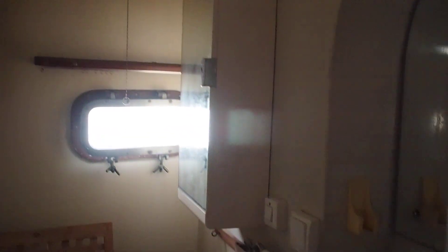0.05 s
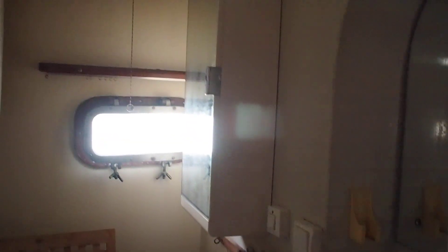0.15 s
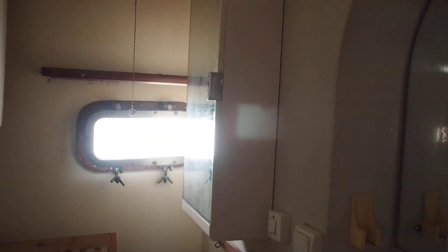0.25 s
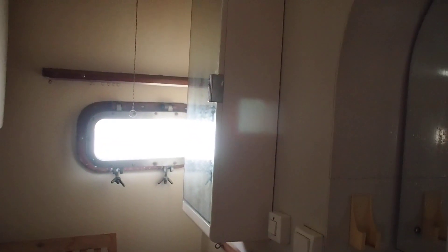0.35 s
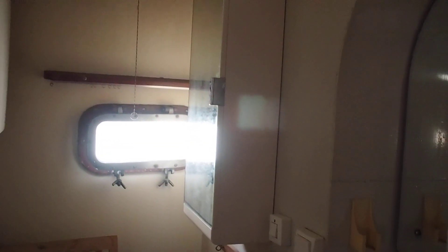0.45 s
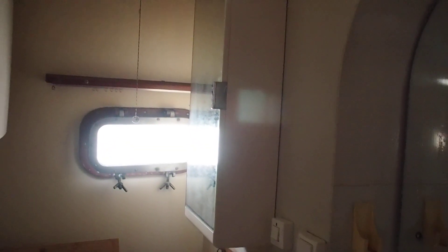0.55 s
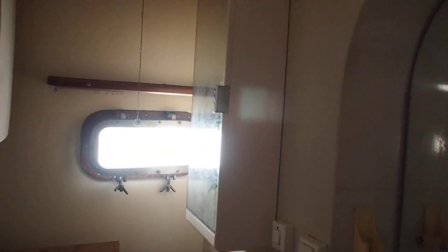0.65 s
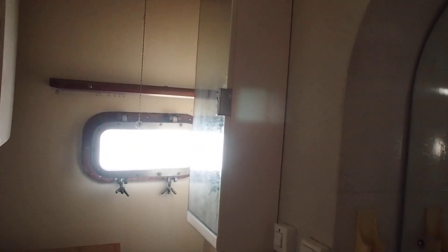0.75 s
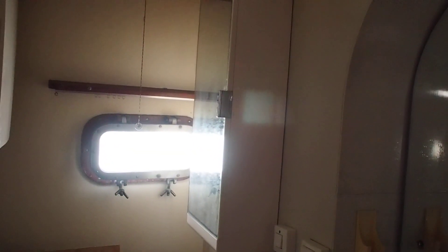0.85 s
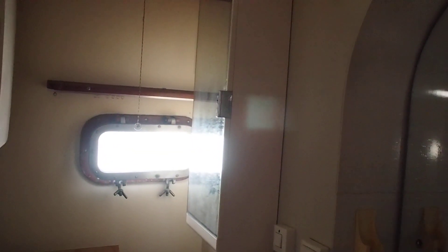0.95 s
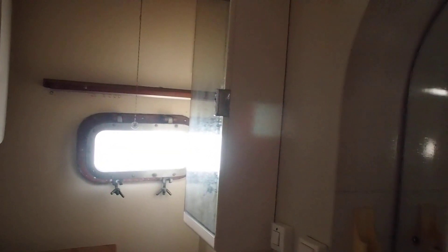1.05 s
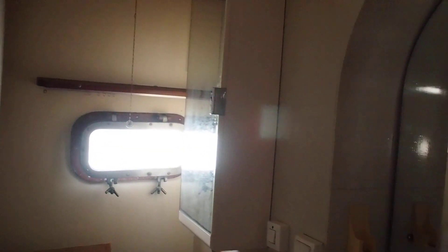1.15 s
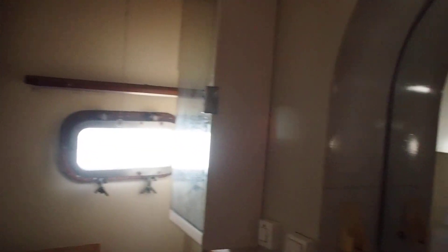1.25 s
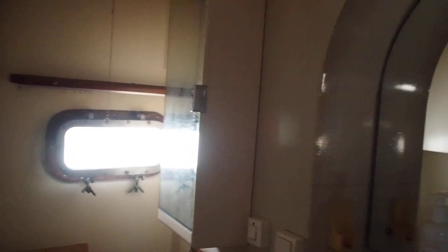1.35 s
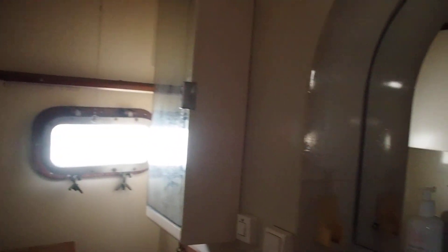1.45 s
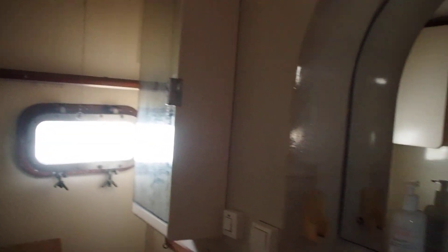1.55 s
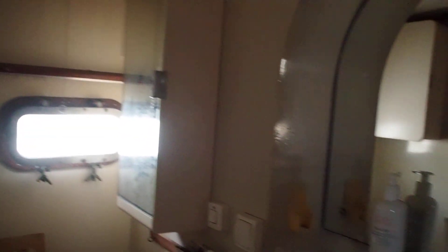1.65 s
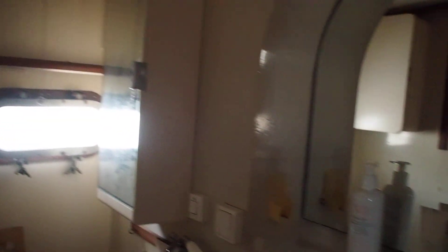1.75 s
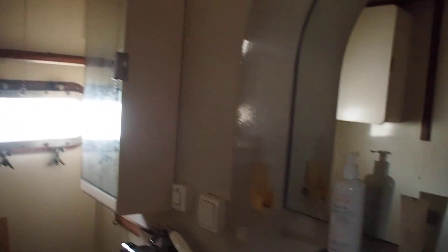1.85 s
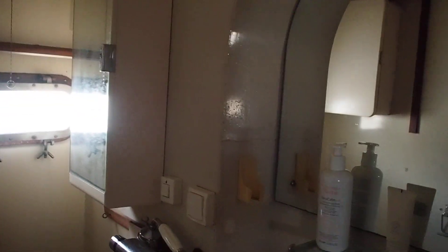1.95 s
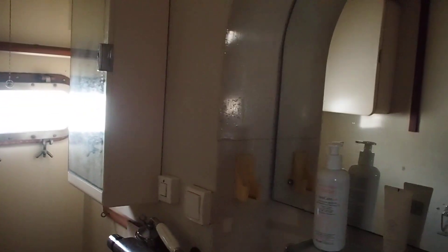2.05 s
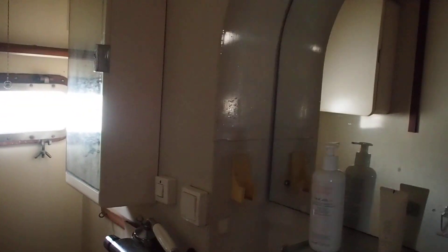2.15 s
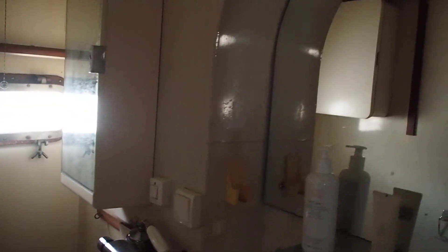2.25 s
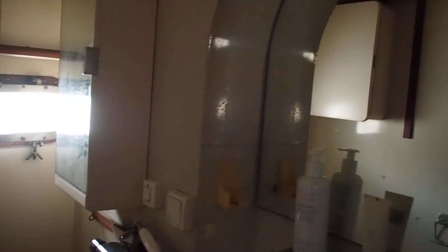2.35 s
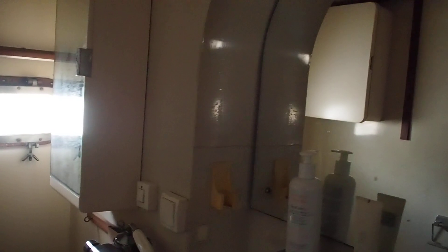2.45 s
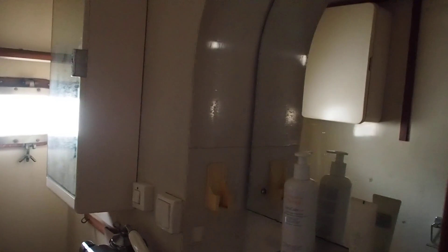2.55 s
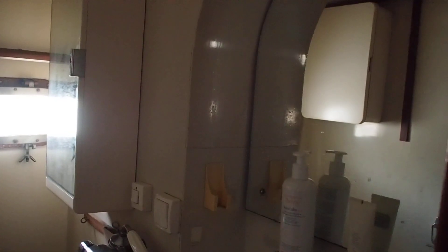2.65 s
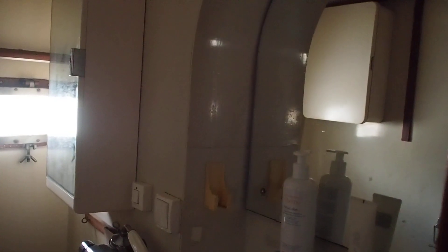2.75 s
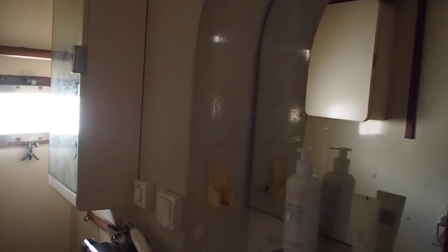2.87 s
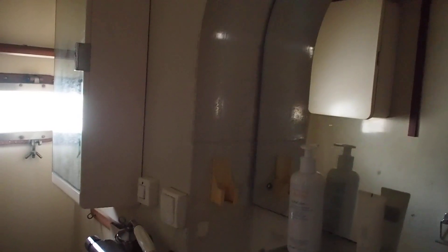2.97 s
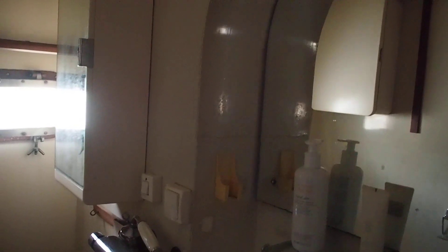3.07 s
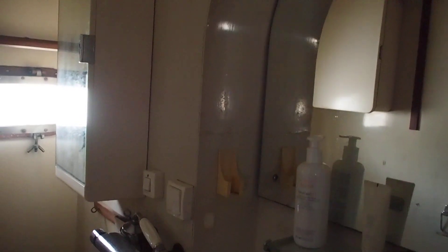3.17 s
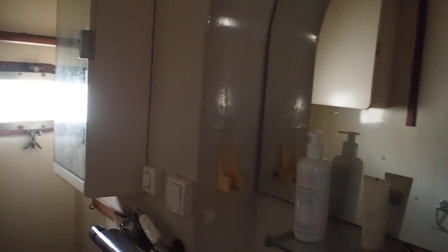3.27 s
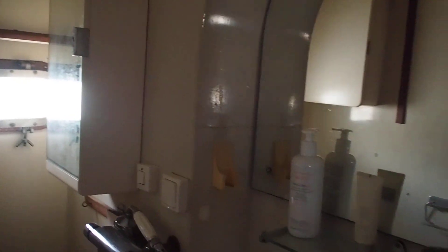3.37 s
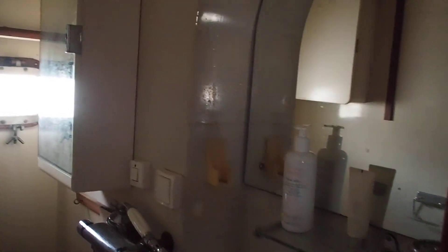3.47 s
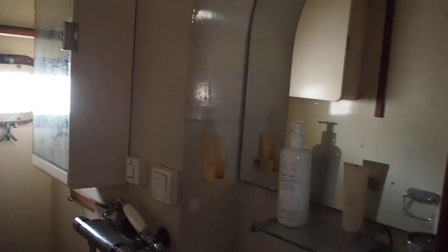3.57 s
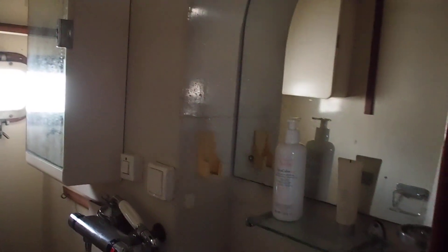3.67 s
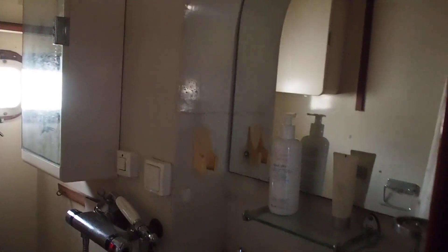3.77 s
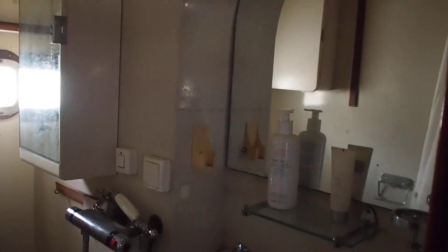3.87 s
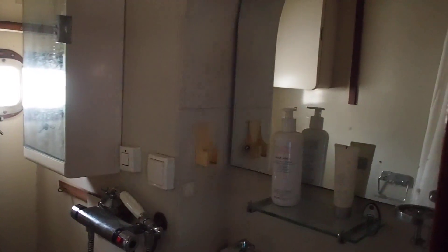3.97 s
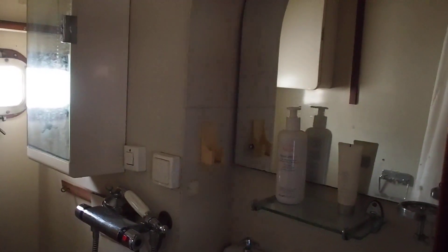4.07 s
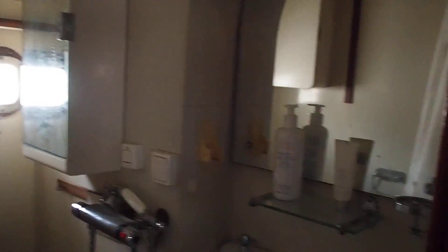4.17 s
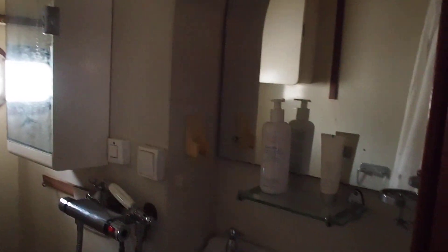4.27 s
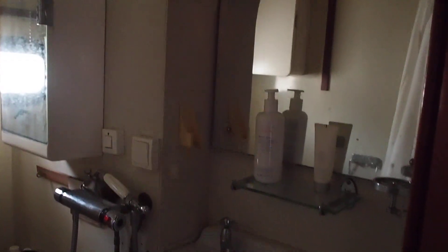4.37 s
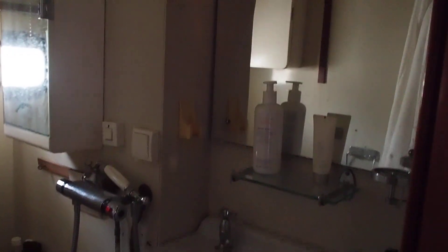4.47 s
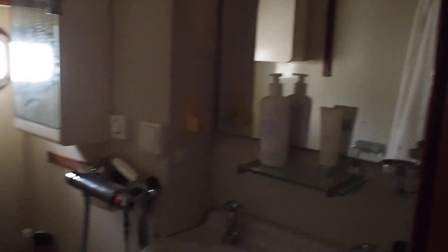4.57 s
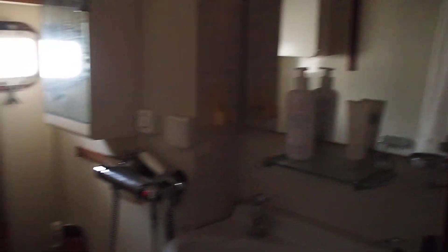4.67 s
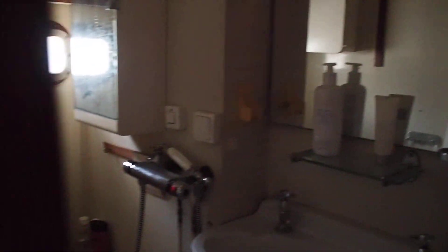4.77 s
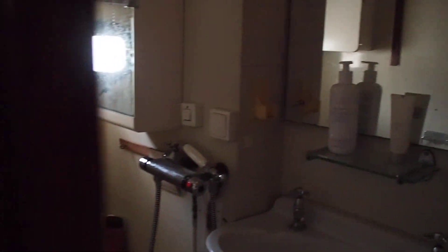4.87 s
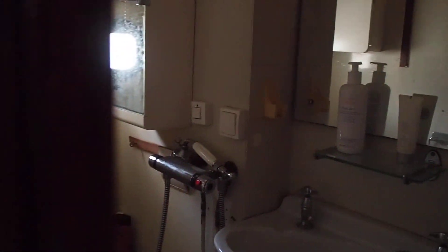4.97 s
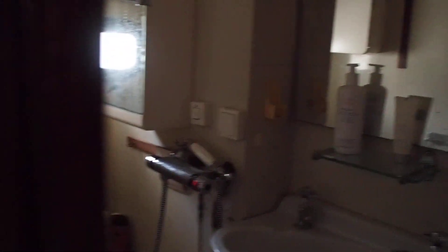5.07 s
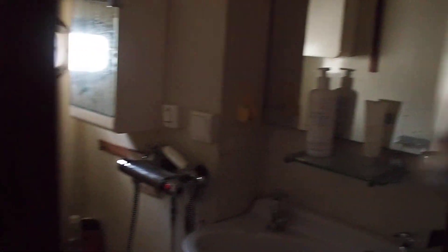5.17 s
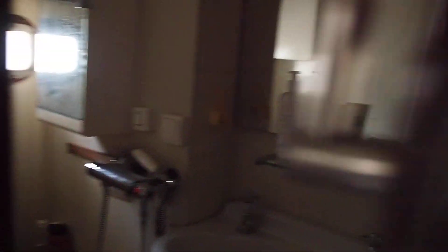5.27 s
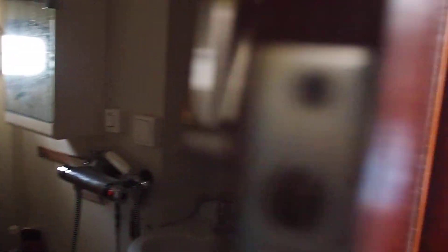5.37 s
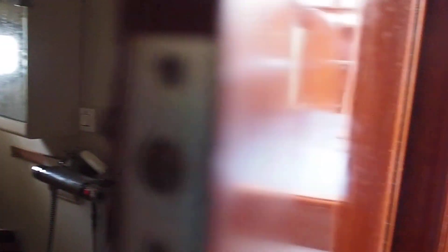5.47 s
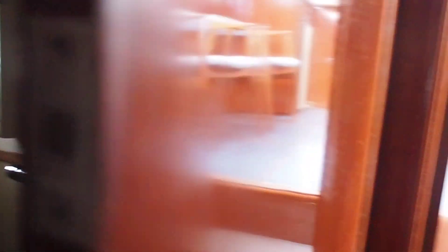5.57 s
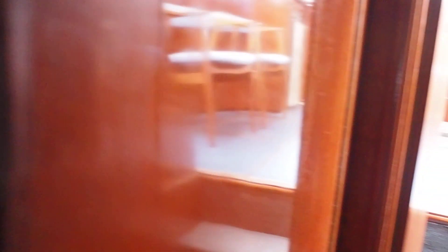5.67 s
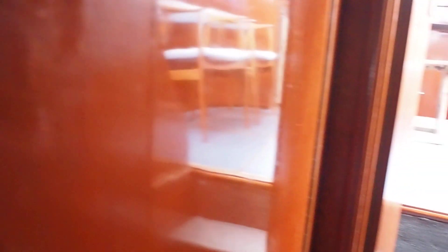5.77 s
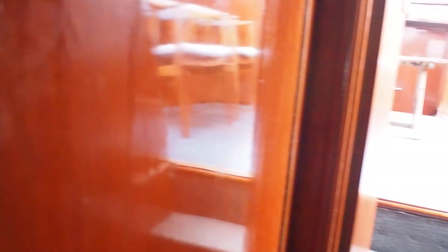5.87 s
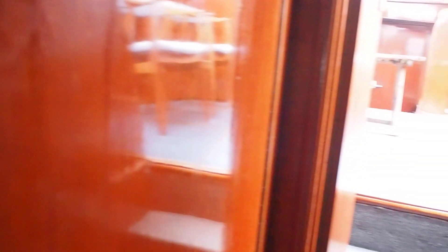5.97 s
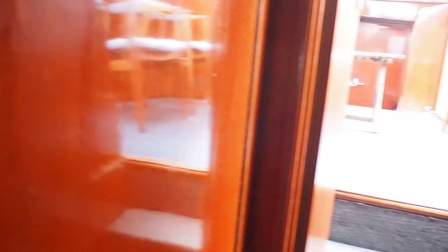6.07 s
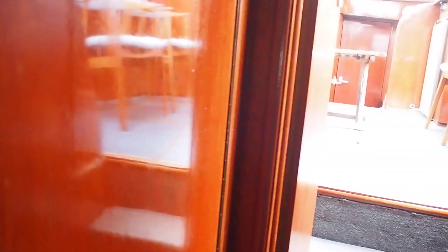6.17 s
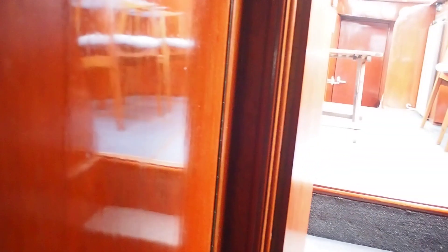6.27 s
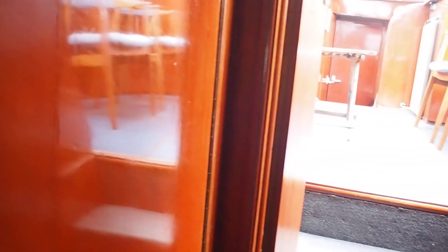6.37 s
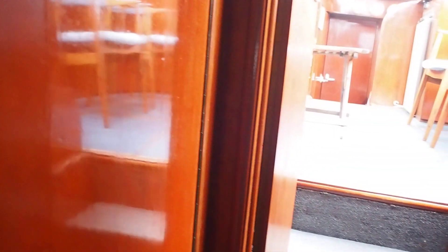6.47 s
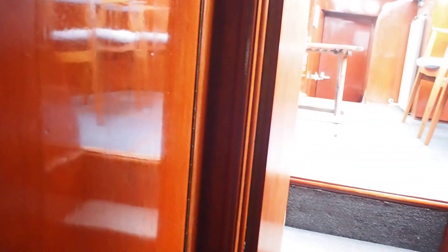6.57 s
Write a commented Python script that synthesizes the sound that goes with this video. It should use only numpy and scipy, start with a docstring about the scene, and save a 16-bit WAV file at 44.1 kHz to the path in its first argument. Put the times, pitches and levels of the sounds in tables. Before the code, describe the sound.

Someone moves about a cramped boat washroom with light knocks and hollow taps before a hard door bang and a buzzing, woody chatter.

```python
"""Bumps and a chattering door in a small wooden boat cabin

Someone shuffles about over a steady hiss: filtered noise makes floorboard rumble, shuffling and brushing cloth.
Bumps on panels and fittings are damped modes and decaying noise bursts, coloured by hull and panel resonances.
A door is pushed shut against its catch; a springy fitting on it then strikes the door unevenly before settling
to twenty strikes a second that fade and soften. Each strike excites the same door modes and cabin tail."""
import sys
import numpy as np
from scipy import signal
from scipy.fft import rfft, irfft, next_fast_len
from scipy.io import wavfile
from scipy.ndimage import uniform_filter1d

SR = 44100
rng = np.random.default_rng(int(sys.argv[2]) if len(sys.argv) > 2 else 0)


def unload_wav(signal):
    """Save mono or channel-first audio to the path in sys.argv[1] as 16-bit WAV at rate SR, clipped to [-1, 1]."""
    wavfile.write(
        sys.argv[1],
        SR,
        np.round(np.clip(np.atleast_2d(signal).T, -1, 1) * 32767).astype(np.int16),
    )


N = 291893
SIZE = next_fast_len(N + SR)  # room for tails, so that filtering does not wrap round
HZ = np.fft.rfftfreq(SIZE, 1 / SR)

# Resonances of the hull. Each row: frequency in Hz, width in Hz, relative level in dB.
HULL = [(51, 20, -51), (89, 23, -7), (109.8, 56, 2.5), (128.2, 31, 5), (213, 39, 0.5), (263.4, 15, 1)]


def amp(db):
    """Level in decibels to a pressure ratio."""
    return 10 ** (np.asarray(db) / 20)


def unit(x):
    """Normalisation to unit root-mean-square."""
    return x / np.sqrt(np.mean(x ** 2))


def shape(table):
    """Zero-phase gain, interpolated in dB over log frequency from (Hz, dB) points."""
    hz, db = np.transpose(table)
    return amp(np.interp(np.log(HZ + 1), np.log(hz + 1), db))


def peaks(table, floor_db=-60):
    """Modal superposition: second-order resonances of alternating sign over a flat floor."""
    response = amp(floor_db)
    for k, (hz, width, db) in enumerate(table):
        damping = 1j * HZ * width
        response = response + (-1) ** k * amp(db) * damping / (hz * hz - HZ ** 2 + damping)
    return response


def colour(x, response):
    """Linear filtering: convolution as multiplication of spectra."""
    return irfft(rfft(x, SIZE) * response, SIZE)[..., :N]


def band(x, lo_hz, hi_hz):
    """Band-pass filtering with maximally flat Butterworth edges."""
    return signal.sosfilt(signal.butter(2, [lo_hz, hi_hz], "bandpass", fs=SR, output="sos"), x)


def walk(rate):
    """Slow random modulation: levels held for 1 / rate seconds, then smoothed twice."""
    hold = int(SR / rate)
    steps = np.repeat(rng.standard_normal(N // hold + 1), hold)
    return 1.29 * uniform_filter1d(uniform_filter1d(steps, hold), hold)[:N]


def add(out, s, x):
    """Superposition: adds x to out from s seconds onwards."""
    i = int(s * SR)
    out[..., i:i + x.shape[-1]] += x[..., :N - i]


def ring(db, hz, rise_s, t60_s):
    """One damped mode: a sine with exponential rise and decay."""
    t = np.arange(SR // 2) / SR
    return (1 - np.exp(-t / rise_s)) * amp(db - 60 * t / t60_s) * np.sin(2 * np.pi * hz * t)


def burst(contact_s, t60_s):
    """Mid and side noise: scraping contact, then the exponential decay of a diffuse field."""
    t = np.arange(SR // 2) / SR
    envelope = (1 - np.exp(-t / 0.0004)) * amp(-60 * np.maximum(t - contact_s, 0) / t60_s)
    return envelope * rng.standard_normal((2, len(t)))


def spread(pair):
    """Spatial coherence: close microphone ports agree in the bass and differ in the treble."""
    # Gain of the side signal. Each row: frequency in Hz, gain in dB.
    side_gain = [(60, -9), (200, -18), (400, -12), (800, -8), (1500, -4), (3000, 0.5), (8000, 1),
                 (15000, -1.5)]
    side = colour(pair[1], shape(side_gain))
    return np.array([pair[0] + side, pair[0] - side])


def moving():
    """Filtered noise: floorboard rumble, shuffling and brushing cloth, each flickering over a hiss."""
    # Level of rumble and shuffle; from about 5.8 s also the door's dying resonance.
    # Each row: time in seconds, rumble in dB, shuffle in dB.
    level_rows = [(0.0, -52.5, -58), (0.39, -54.5, -56), (0.68, -50, -55), (0.83, -49, -57),
                  (1.42, -43, -51.5), (2.27, -49.5, -54.5), (2.8, -47.5, -60.5), (3.15, -52, -57.5),
                  (3.85, -43.5, -52), (3.98, -47, -57.5), (4.37, -51.5, -55.5), (4.64, -55, -45),
                  (5.0, -51, -55.5), (5.2, -49, -47.5), (5.5, -54.5, -52.5), (5.68, -47, -49),
                  (5.78, -39.5, -42), (6.03, -35.5, -51), (6.62, -43, -49.5)]
    # Cloth near the microphones. Each row: start in seconds, length in seconds, level in dB.
    brush_rows = [(0.193, 0.14, -52.5), (0.548, 0.11, -54), (1.648, 0.13, -51), (1.995, 0.08, -54.5),
                  (4.695, 0.11, -58)]
    # Spectra of shuffle and hiss. Each row: frequency in Hz, relative level in dB.
    shuffle_spectrum = [(200, -6.5), (320, -24), (430, 0), (600, -8), (800, -10), (1400, -11.5),
                        (1700, -41), (3000, -19.5), (7000, -29)]
    hiss_spectrum = [(900, -13.5), (1500, -3.5), (3000, -8), (5600, -6.5), (8000, -9.5), (12000, -8.5),
                     (14500, -31), (15900, -32)]
    hiss_db = -60

    t = np.arange(N) / SR
    s, *columns = np.transpose(level_rows)
    rumble_db, shuffle_db = (np.interp(t, s, column) for column in columns)
    rumble, shuffle, hiss, brush = rng.standard_normal((4, 2, N))

    # each hull resonance flickers by itself
    boards = sum(amp(8.45 * walk(9.7)) * colour(rumble, peaks([mode])) for mode in HULL)
    strokes = np.zeros(N)
    for start, length, db in brush_rows:
        rise = np.clip((t - start) / 0.0034, 0, 1)
        fall = np.clip((start + length - t) / 0.057, 0, 1)
        strokes += amp(db) * rise * fall

    rumble = amp(rumble_db) * unit(boards)
    shuffle = amp(shuffle_db + 2.1 * walk(25)) * unit(colour(shuffle, shape(shuffle_spectrum)))
    hiss = amp(hiss_db + 0.36 * walk(6.2)) * unit(colour(hiss, shape(hiss_spectrum)))
    cloth = strokes * amp(0.7 * walk(33)) * unit(band(brush, 2300, 14000))
    return spread(rumble + shuffle + hiss + cloth)


def fittings():
    """Impact excitation: hollow tocks with a cabin answer, bright ticks, and hull flexing under steps."""
    # Taps on hollow fittings, small hard ticks of a fitting, and heavy steps that flex the hull.
    # Each row: start in seconds, nominal level in dB, frequency in Hz.
    tock_rows = [(1.311, -30, 400), (1.363, -36.5, 406), (2.452, -25.5, 406), (2.573, -25, 426),
                 (2.712, -27.5, 408), (2.897, -26, 417), (3.521, -38, 380), (4.977, -31, 382),
                 (5.033, -26, 382)]
    tick_rows = [(1.022, -37, 1440), (1.159, -37, 1340), (2.8555, -26, 1800), (3.4795, -38, 1830),
                 (3.5239, -42, 1920), (3.5726, -37.5, 1850), (3.6311, -44, 1900), (4.374, -40, 1820),
                 (5.1497, -23.5, 1870), (5.1993, -30.5, 1390), (5.2716, -18.5, 1510)]
    step_rows = [(.5, -55, 51.4), (1.709, -36, 52.5), (1.884, -37, 99.2), (1.973, -43, 104.7),
                 (2.45, -46, 52.6), (3.476, -44, 119), (3.55, -60, 77), (3.821, -38, 51), (3.829, -37, 85),
                 (5.04, -40, 52.3), (5.85, -26, 51), (5.871, -27, 79.3), (5.959, -31.5, 125),
                 (6.08, -38, 51.3), (6.33, -42, 123)]

    out = np.zeros((2, N))
    for s, db, hz in tock_rows:
        add(out[0], s, ring(db + 5, hz, rise_s=0.0025, t60_s=0.059))
        answer = band(burst(0.012, t60_s=0.16), 220, 1050)
        add(out, s + 0.001954, amp(db - 0.5) * answer)
    for s, db, hz in tick_rows:
        add(out, s, amp(db + 4.5) * band(burst(0.006, t60_s=0.11), hz / 1.53, hz * 1.126))
    for s, db, hz in step_rows:
        add(out[0], s, ring(db + 3, hz, rise_s=0.003, t60_s=0.56))
    return spread(out)


def bumps():
    """Impact response: each blow shakes the hull, rings the panels and cracks; the thud noise lasts longest."""
    # Blows on the woodwork. Each row: start in seconds, nominal level in dB, then relative to it thud in dB,
    # thud frequency in Hz, crack in dB, sizzle in dB, body centre in Hz, contact in milliseconds.
    blow_rows = [(0.321, -46.5, -18, 124, -23.5, -1, 1020, 7.1), (0.454, -38, -16, 148, -30, -32, 514, 12),
                 (0.486, -19, -15, 107, -8, -9.5, 436, 17.6), (1.019, -38.5, -15, 140, -28, -26, 1420, 8),
                 (1.161, -48, -19, 190, -14, -24, 680, 4.5), (1.295, -34.5, -15, 223, -22, -23, 445, 5.6),
                 (1.325, -32, -13, 186, -0.5, -11, 450, 10.4), (1.679, -38.5, -10, 232, -7, -7, 770, 15),
                 (1.9, -36.5, -13, 98, -7.5, -10, 590, 15), (2.423, -45.5, 2, 98, -21, -29, 350, 7),
                 (2.734, -32, -11, 197, -7.5, -10, 532, 5.7), (2.853, -34.5, -19.5, 238, -31, -40, 1560, 6),
                 (2.93, -29.5, -13.5, 234, -5.5, -4.5, 473, 15.4),
                 (3.253, -51.5, -1, 202, -13, -20, 465, 8), (3.521, -32, -5.5, 94, -36, -14, 374, 5.9),
                 (3.569, -39, -28, 116, -23, -28, 377, 5.4), (3.729, -13, -19, 246, -34, -20, 1190, 6.1),
                 (3.792, -41.5, -15, 198, -13, 5, 496, 5.4), (3.951, -38, -8, 228, -35, -31, 460, 10),
                 (4.038, -40, -3.5, 130, -32, -29, 380, 7), (4.114, -36, -8.5, 218, -22, -17, 386, 5.3),
                 (4.226, -36, -7.5, 127, -30, -15, 373, 11), (4.378, -35.5, -7, 124, -22, -29, 408, 5.7),
                 (4.431, -28.5, -21, 103, -17, -19, 545, 5),
                 (4.567, -17.5, -24.5, 232, -13, -8.5, 1005, 4.6),
                 (4.624, -23.5, -12.5, 290, -15, -35, 834, 20),
                 (4.639, -23.5, -19, 206, -20, -18, 975, 6.4), (4.756, -32.5, -8, 268, -12, -18, 607, 4.4),
                 (4.858, -39, -14, 228, -14, -24, 1010, 8.4), (4.977, -35, -4, 115, -10, -5, 357, 2.1),
                 (5.038, -34, 1.5, 176, -32, -13, 334, 3.7), (5.149, -23, -13, 262, -8, -21, 310, 23),
                 (5.189, -23.5, -14, 248, -17, -40, 308, 13), (5.269, -22, -14.5, 256, -4, -24, 311, 7.3),
                 (5.348, -37, -5, 113, -22, -14, 432, 6), (5.587, -11.5, -16, 273, -3, -13.5, 744, 2.5),
                 (5.726, -36.5, -3, 230, -21, -11, 404, 6.2), (5.829, -5.5, -22.5, 260, 2.5, -6.5, 1307, 3),
                 (5.86, -14.5, -14, 112, 1.5, -33, 598, 5.6), (5.904, -23.5, -10, 109, 3, -33, 499, 4.5)]
    # Resonances of the panels. Each row: frequency in Hz, width in Hz, relative level in dB.
    panel_modes = [(380, 105, -13.5), (550, 164, 1), (1092, 140, -7.5), (1367, 62, -3), (1914, 153, -7.5)]
    # harder blows shake more of the panelling: octaves either side of the body centre
    spread_oct, spread_oct_per_db, least_oct, most_oct, soft_db = 1, 0.3, 0.2, 1.68, -36.5
    grit_db, grit_per_s = 2, 330  # uneven contact: depth and pace

    thud, body, crack, sizzle = np.zeros((4, 2, N))
    for s, db, thud_db, thud_hz, crack_db, sizzle_db, hz, contact_ms in blow_rows:
        contact = contact_ms / 1000
        edge = 2 ** np.clip(spread_oct + spread_oct_per_db * (db - soft_db), least_oct, most_oct)

        add(thud[0], s, ring(db + thud_db + 11, thud_hz, rise_s=0.0013, t60_s=0.11))
        # dividing by the root of the bandwidth keeps the noise level alike at any pitch
        low = band(burst(contact, t60_s=0.35), thud_hz / 2.8, thud_hz * 1.64) / np.sqrt(thud_hz / SR)
        add(thud, s + 0.00312, amp(db + thud_db - 1) * low)

        bandwidth = hz * (edge - 1 / edge)
        knock = band(burst(contact, t60_s=0.18), hz / edge, hz * edge) / np.sqrt(bandwidth / SR)
        add(body, s, amp(db) * knock)
        add(body[0], s, ring(db + 1.5, hz, rise_s=0.00066, t60_s=0.13))

        add(crack, s, amp(db + crack_db) * burst(contact, t60_s=0.12))
        scratch = amp(-2) * burst(contact, t60_s=0.15) + amp(2) * burst(0.002, t60_s=0.032)
        add(sizzle, s, amp(db + sizzle_db) * scratch)

    body, crack, sizzle = (x * amp(grit_db * walk(grit_per_s)) for x in (body, crack, sizzle))
    hull = amp(0.5) * colour(thud, peaks(HULL, floor_db=-10.5))
    panels = amp(-5) * colour(body, peaks(panel_modes, floor_db=-13))
    crack = amp(-0.5) * band(crack, 1750, 4260)
    sizzle = amp(-5) * band(sizzle, 6750, 11900)
    return spread(hull + panels + crack + sizzle)


def strikes_of_fitting():
    """Near-periodic oscillation: strikes (s, level dB, hardness dB), uneven at first, then an even swing."""
    # Uneven first strikes. Each row: start in seconds, nominal level in dB, hardness in dB relative to it.
    first_strikes = [(5.907, -13, -28), (5.935, -18, -26), (5.957, -14.5, -39), (5.982, -17, -14.5),
                     (6.0055, -9, -25), (6.0567, -8, -18.5), (6.1047, -8, -17.5)]
    swing_from_s, swing_period_s, jitter_s = 6.1555, .05002, .0002
    # level and hardness fall steadily from their values at this time
    fade_from_s, swing_db, fade_db_per_s = 6.117, -6, 18.5
    hard_db, soften_db_per_s = -15.5, 17

    s = np.arange(swing_from_s, N / SR, swing_period_s)
    s = s + jitter_s * rng.standard_normal(len(s))
    late = s - fade_from_s
    swing = zip(s, swing_db - fade_db_per_s * late, hard_db - soften_db_per_s * late)
    return first_strikes + list(swing)


def chatter():
    """Impulse response: strikes land on one spot, so door and cabin answer alike; only the scrape varies."""
    # Modes of the door. Each row: frequency in Hz, relative level in dB, 60 dB decay time in seconds.
    door_modes = [(416, -25, 0.11), (502.6, -9, 0.13), (522, -3.5, 0.15), (579, -4, 0.2), (629.7, 2, 0.12),
                  (723.5, -3, 0.17), (777, -1, 0.12), (1170, -18, 0.088), (1242, -14, 0.13),
                  (1343, -17.5, 0.31), (1433, -15.5, 0.094), (1930, -14, 0.19), (1907, -8, 0.096),
                  (2020, 6, 0.03), (2150, -16, 0.14), (2533, 0, 0.052), (2710, 1, 0.029), (2910, -3, 0.059),
                  (3146, -4.5, 0.086), (3320, -9, 0.042), (3530, 3.5, 0.027), (3617, -5, 0.082),
                  (3923, 6, 0.026), (4000, 0, 0.029), (4064, 6, 0.027), (4400, -27, 0.054),
                  (5500, -34, 0.056), (6100, -26, 0.055)]
    # Early echoes of each strike. Each row: delay in seconds, relative level in dB.
    echo_rows = [(.0021, 0), (.0043, -1), (.0125, -7)]
    # Spectrum of the diffuse tail. Each row: frequency in Hz, gain in dB.
    tail_spectrum = [(240, -18.5), (400, -2), (508, -3), (871, -4.5), (1970, -7), (2220, -7), (3940, -9.5),
                     (7000, -18.5), (9100, -36), (15400, -120)]
    lag_s = .00004  # the door is on the left: the right port hears its modes a little later

    strikes, ticks = np.zeros((2, N))
    scrape = np.zeros((2, N))
    for s, db, hardness_db in strikes_of_fitting():
        i = int(s * SR)
        strikes[i] = amp(db)
        ticks[i] = amp(db + hardness_db)
        add(scrape, s, amp(db - 9.0) * burst(0.0032, t60_s=0.26))  # no two contacts grate alike

    door = np.zeros(SR // 2)
    for k, (hz, db, t60) in enumerate(door_modes):
        door += (-1) ** k * ring(db, hz, rise_s=0.00038, t60_s=t60)
    echoes = 1 + sum(amp(db) * np.exp(-2j * np.pi * HZ * s) for s, db in echo_rows)
    ports = np.array([np.ones(len(HZ)), np.exp(-2j * np.pi * HZ * lag_s)])
    modes = amp(-19) * colour(strikes, rfft(door, SIZE) * echoes * ports)

    # one noise response each for cabin, bright contact and click, shared by all strikes
    cabin, bright, click = np.zeros((3, 2, N))
    add(cabin, 0, burst(.005, t60_s=.1))
    add(bright, 0, burst(0.0013, t60_s=0.034))
    add(click, 0, burst(0.00085, t60_s=0.014))
    tail = shape(tail_spectrum)
    diffuse = amp(-3.5) * colour(strikes, tail * rfft(spread(cabin), SIZE))
    grating = spread(colour(scrape, tail))
    clatter = amp(9) * band(colour(ticks, rfft(spread(bright), SIZE)), 3700, 7560)
    snap = amp(1.5) * band(colour(ticks, rfft(spread(click), SIZE)), 9800, 13100)
    return modes + diffuse + grating + clatter + snap


def scene():
    """Time difference between ports: bumps and fittings reach the right first, then the left after a turn."""
    port_lag_s, turn_s = .00006, 5.5
    turned_side_db = -1.5  # after the turn the ports differ less

    near = bumps() + fittings()
    late = colour(near, np.exp(-2j * np.pi * HZ * port_lag_s))
    turned = np.arange(N) / SR > turn_s
    blows = np.where(np.array([turned, ~turned]), near, late)
    left, right = blows + chatter() + moving()
    mid = (left + right) / 2
    side = (left - right) / 2 * amp(turned_side_db * turned)
    return np.array([mid + side, mid - side])


def record(dry):
    """Transducer response: port notches, a bass roll-off, a small offset, full-scale clipping, a treble cut."""
    # Notches of the microphone housing. Each row: frequency in Hz, width in Hz, depth from 0 to 1.
    notch_rows = [(6594, 660, 0.84), (10480, 2300, 0.8)]
    rumble_cut_hz, top_hz, offset = 58, 15900, -.0028

    notches = np.prod([1 - depth * peaks([(hz, width, 0)]) for hz, width, depth in notch_rows], axis=0)
    bass_cut = 1j * HZ / (rumble_cut_hz + 1j * HZ)
    clipped = np.clip(colour(dry, notches * bass_cut) + offset, -1, 1)
    return signal.sosfilt(signal.ellip(10, .2, 70, top_hz, fs=SR, output="sos"), clipped)


dry = scene()
out = record(dry)
unload_wav(out)
```